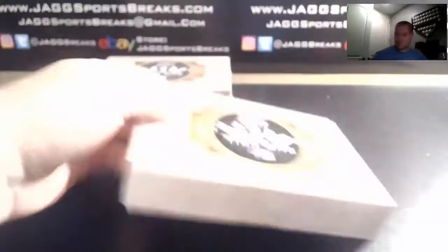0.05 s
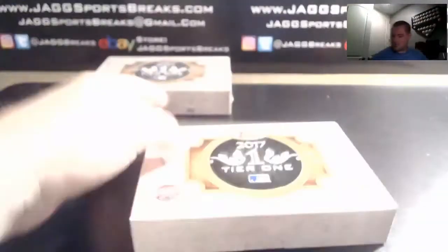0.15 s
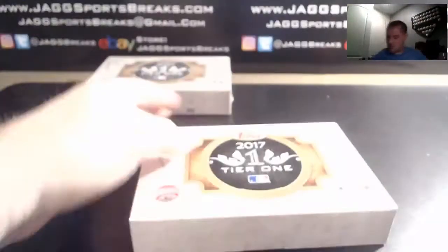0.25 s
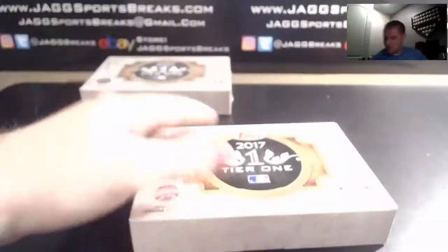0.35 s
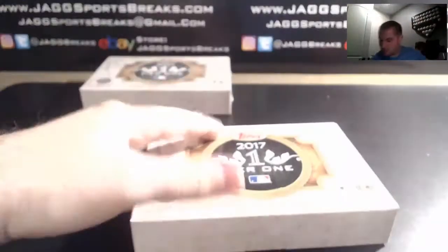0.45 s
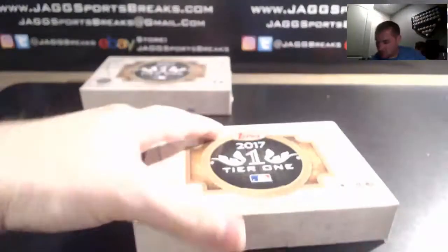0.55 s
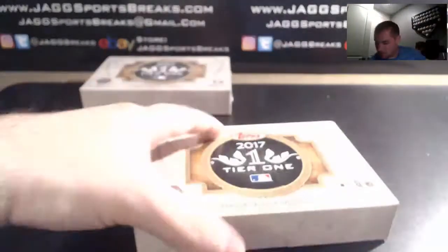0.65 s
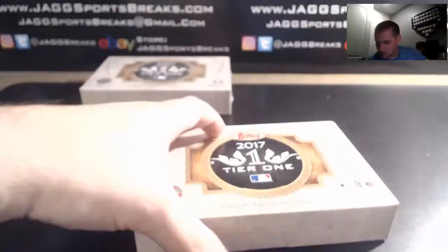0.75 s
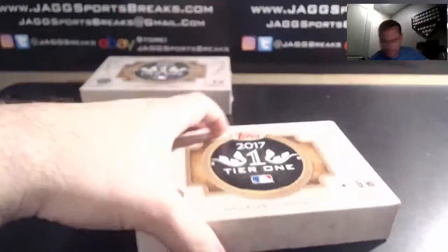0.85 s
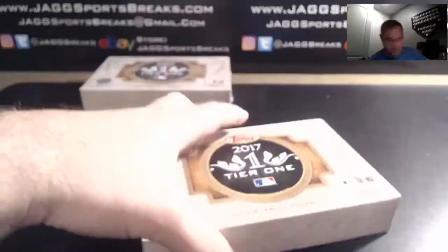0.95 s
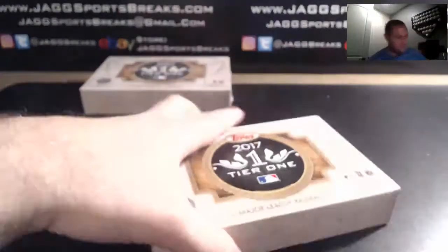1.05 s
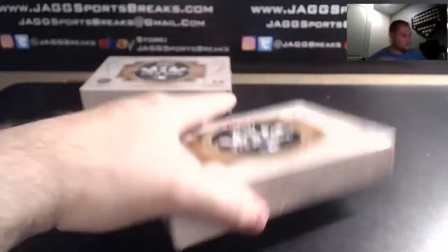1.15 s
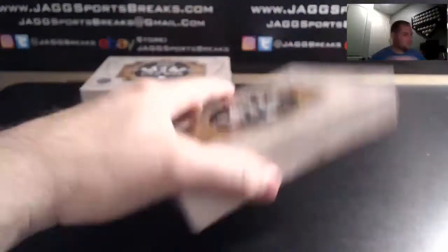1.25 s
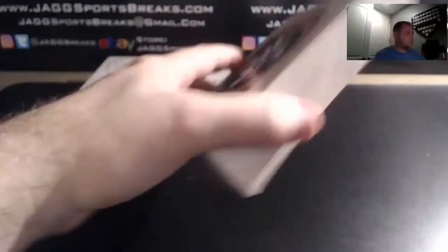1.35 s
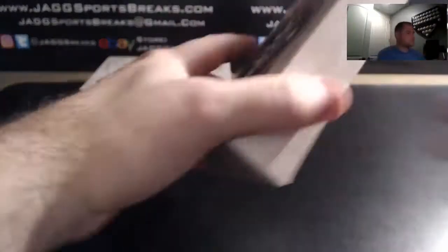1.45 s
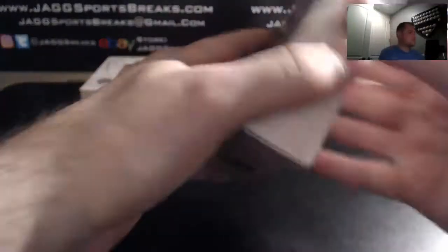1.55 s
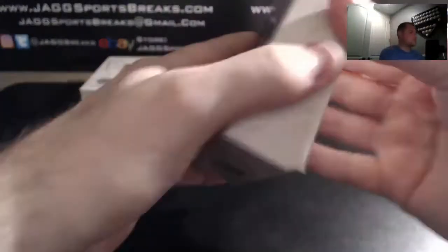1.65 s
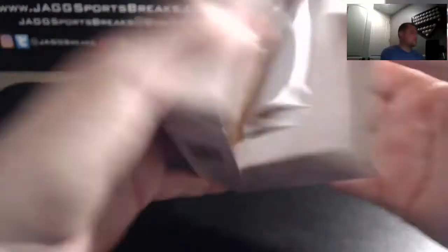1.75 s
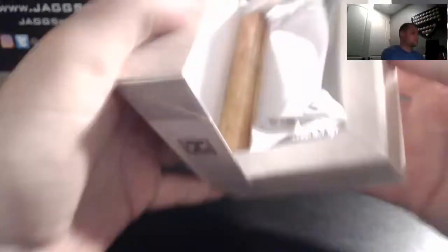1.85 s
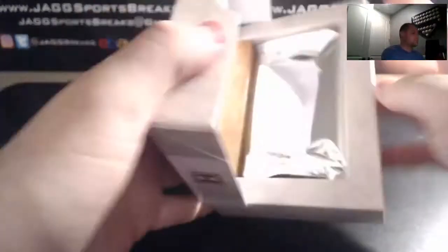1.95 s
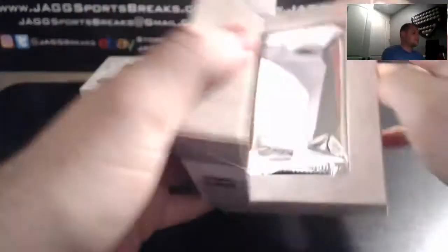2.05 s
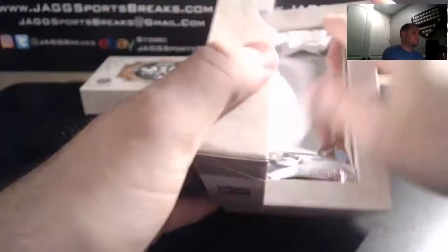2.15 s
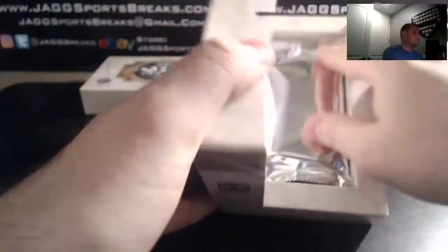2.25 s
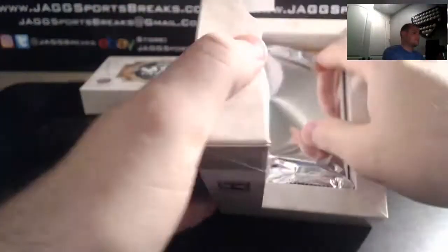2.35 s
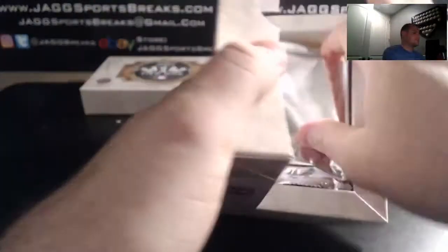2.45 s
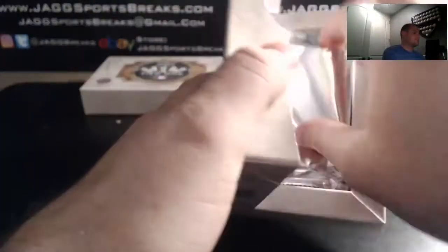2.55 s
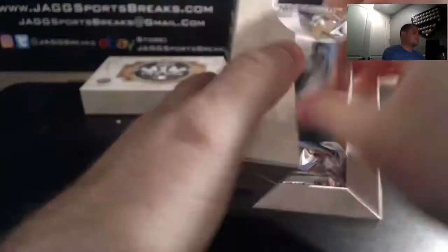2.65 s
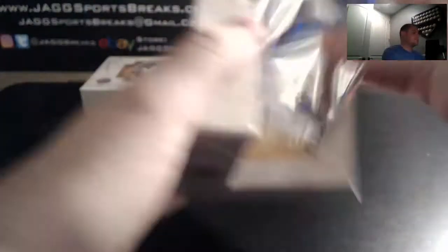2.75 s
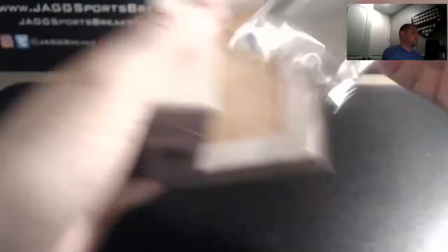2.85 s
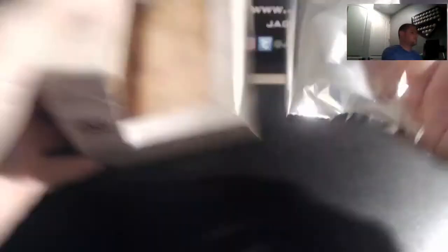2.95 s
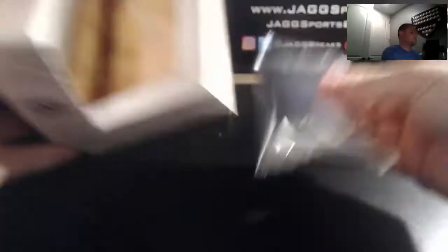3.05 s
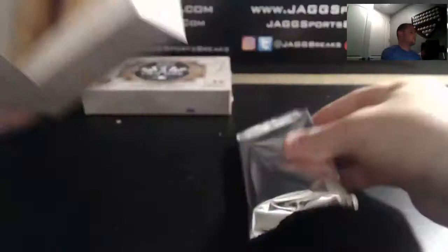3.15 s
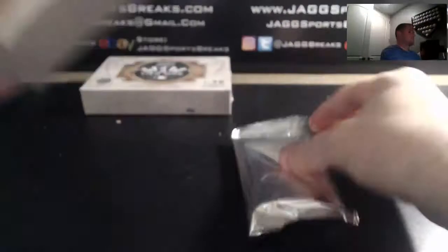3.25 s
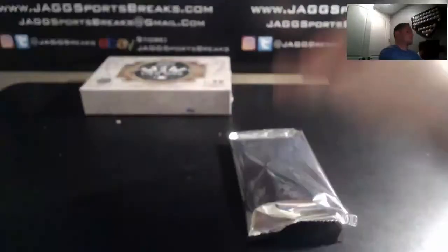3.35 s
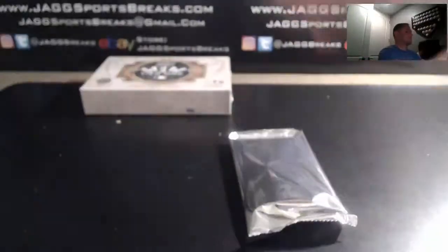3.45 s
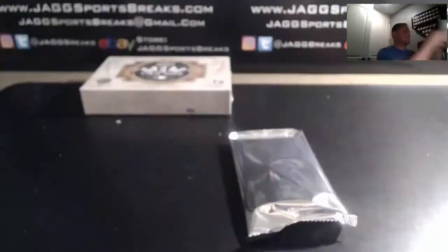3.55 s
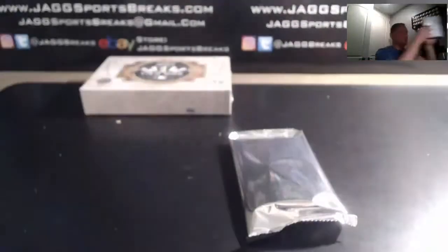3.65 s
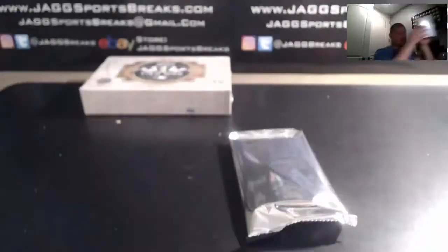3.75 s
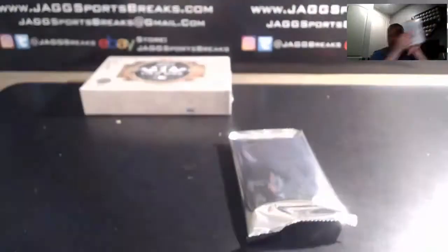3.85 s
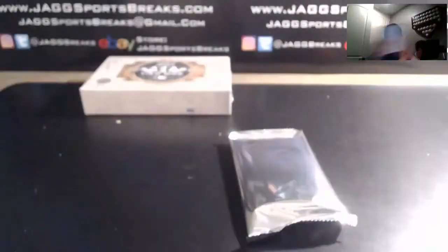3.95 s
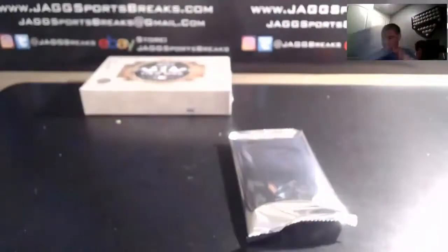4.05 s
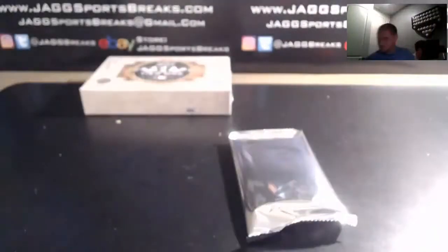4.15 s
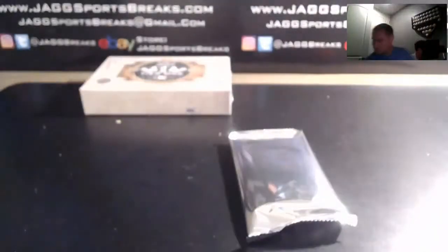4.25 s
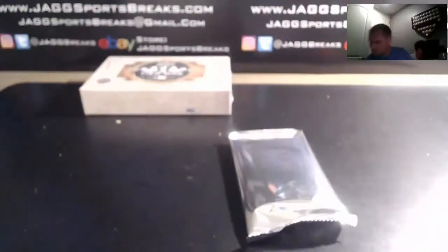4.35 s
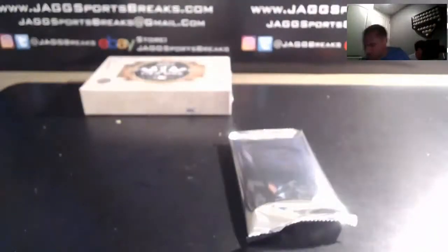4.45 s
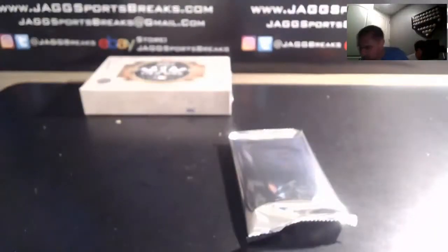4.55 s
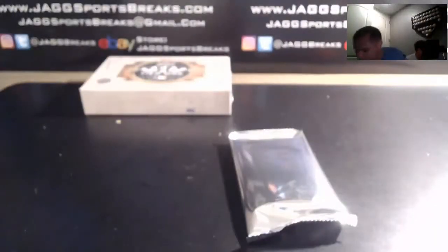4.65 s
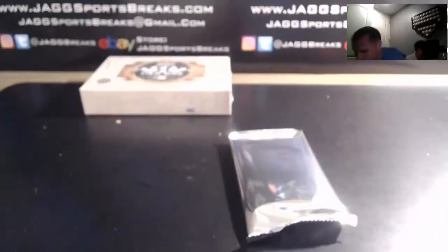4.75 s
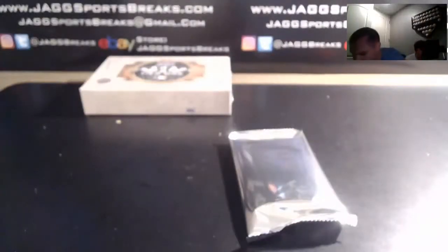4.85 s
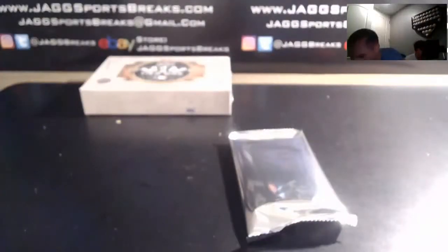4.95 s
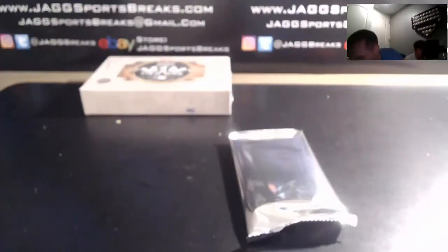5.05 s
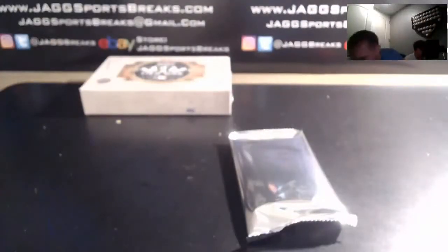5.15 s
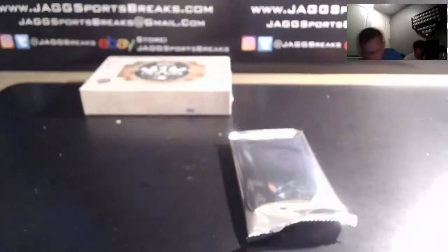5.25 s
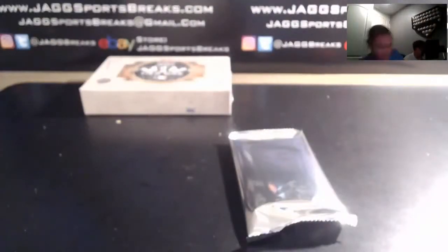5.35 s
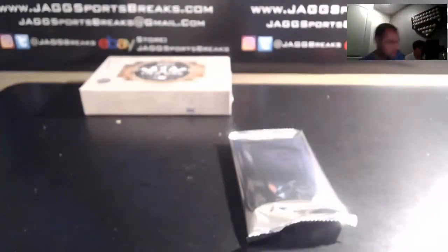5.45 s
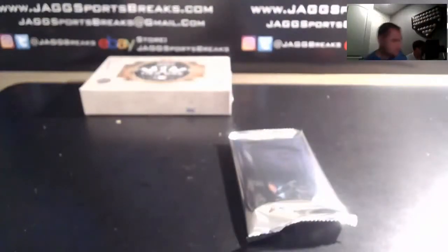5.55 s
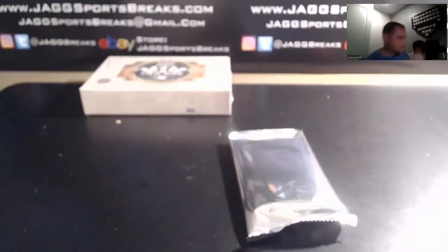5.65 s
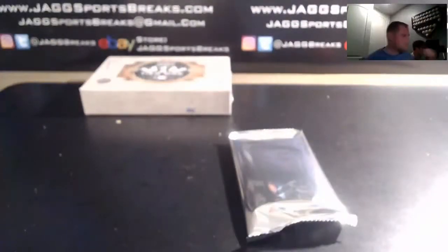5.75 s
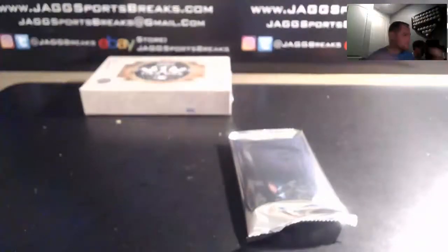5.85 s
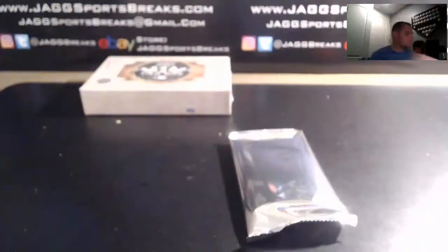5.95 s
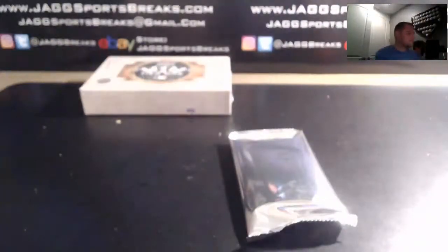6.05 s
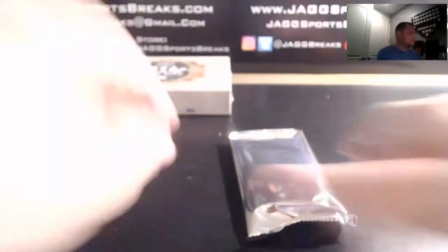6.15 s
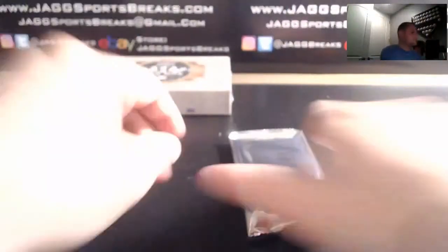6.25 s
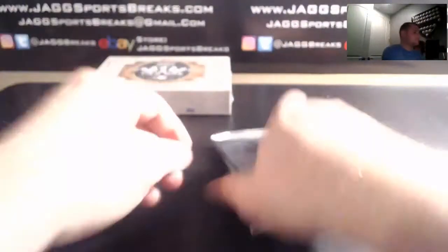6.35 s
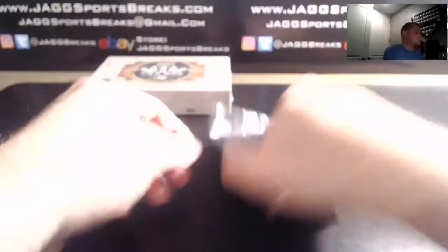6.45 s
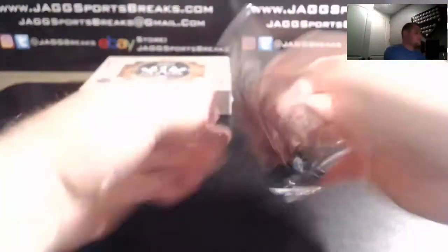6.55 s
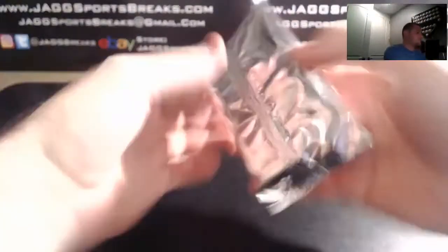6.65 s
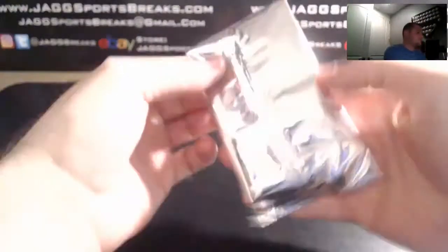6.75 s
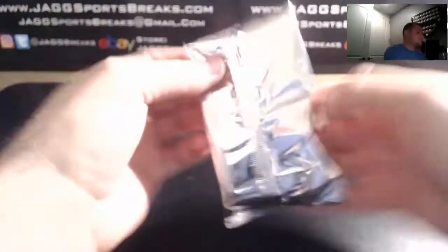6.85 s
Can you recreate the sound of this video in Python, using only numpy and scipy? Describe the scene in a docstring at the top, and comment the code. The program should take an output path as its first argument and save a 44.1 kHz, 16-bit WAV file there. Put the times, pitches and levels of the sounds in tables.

```python
"""At a desk in a small, bare room with a faint hum, a cardboard box is set down and its tight lid dragged off.
A plastic-wrapped card pack is pulled out, crinkling and squeaking, and laid down; the empty box is tossed
aside, something rustles beside the desk, and the pack is picked up again. Decaying noise bursts ring modes for
snaps, knocks and bumps; random grains shaped by hand strokes make the crinkle, drag and rubbing.
The close microphone overloads on the loudest blows."""
import sys
import numpy as np
from scipy import signal
from scipy.fft import rfft, irfft, next_fast_len
from scipy.io import wavfile
from scipy.ndimage import uniform_filter1d, map_coordinates

SR = 44100
rng = np.random.default_rng(int(sys.argv[2]) if len(sys.argv) > 2 else 0)


def put_to_file(sound):
    """Save the sound as 16-bit audio at rate SR, in the file named by the first command-line argument."""
    columns = np.atleast_2d(sound).T  # one column per channel
    safe = np.clip(columns, -1, 1)
    whole_steps = np.round(safe * 32767)
    wavfile.write(sys.argv[1], SR, whole_steps.astype(np.int16))


N = 304731
TIME = np.arange(N) / SR


def amp(db):
    """Amplitude ratio of a level in dB."""
    return 10 ** (np.asarray(db) / 20)


def unit(x):
    """x at an RMS of 1."""
    return x / np.sqrt(np.mean(x ** 2) + 1e-20)


def along(points, hz):
    """Interpolate (Hz, value) points on a log frequency axis."""
    f, v = np.transpose(points)
    return np.interp(np.log(hz + 1), np.log(f + 1), v)


def filtered(x, response):
    """x times a zero-phase response of frequency."""
    size = next_fast_len(len(x) + 8192)
    spectrum = rfft(x, size) * response(np.fft.rfftfreq(size, 1 / SR))
    return irfft(spectrum, size)[:len(x)]


def causal(x, gain, size=4096):
    """x through the minimum-phase filter that has this gain of frequency."""
    cepstrum = irfft(np.log(np.maximum(gain(np.fft.rfftfreq(size, 1 / SR)), 1e-6)))
    # Folding the cepstrum makes the phase minimal
    cepstrum[1:size // 2] *= 2
    cepstrum[size // 2 + 1:] = 0
    impulse_response = irfft(np.exp(rfft(cepstrum)))
    return signal.fftconvolve(x, impulse_response)[:len(x)]


def hump(hz, centre_hz, q):
    """Gain of one broad resonance."""
    ratio = (hz + 1) / centre_hz
    return 1 / np.sqrt(1 + (q * (ratio - 1 / ratio)) ** 2)


def wobble(rate):
    """A random curve of straight segments, rate knots a second."""
    knots = rng.standard_normal(int(N * rate / SR) + 4)
    return map_coordinates(knots, [TIME * rate], order=1)


def strokes(rows, power=1.89):
    """Gain over time: each movement speeds up from rest and slows to rest; sound grows as a power of speed."""
    gains = []
    for s, db, rise_s, fall_s in rows:
        speed = np.interp(TIME, [s - rise_s, s, s + fall_s], [0, 1, 0])
        gains.append(amp(db) * speed ** power)
    return np.linalg.norm(gains, axis=0)


def add(track, s, sound):
    """Mix a sound into the track at a time."""
    start = max(round(s * SR), 0)
    track[start:start + len(sound)] += sound[:max(N - start, 0)]


def grains(rate, spread_db):
    """Random tiny impulses, rate a second on average, mostly weak and a few strong."""
    size = amp(spread_db * np.minimum(rng.exponential(size=N), 4))
    present = rng.random(N) < rate / SR
    return present * rng.choice([-1, 1], N) * size


def patchy(x, depth_db):
    """Each band swells and fades by itself for some tens of milliseconds."""
    z = signal.stft(x, nperseg=256)[2]
    field = uniform_filter1d(rng.standard_normal(z.shape), size=7, axis=0)  # over frequency
    field = uniform_filter1d(field, size=9, axis=1)  # over time
    return unit(signal.istft(z * amp(depth_db * unit(field)), nperseg=256)[1][:N])


def room(x, wet_db, gap_s=0.0016):
    """The direct sound, then the walls' answer, each frequency dying at its own speed."""
    # Each row: frequency in Hz, t60 in s.
    decay_points = [(100, 0.36), (260, 0.33), (700, 0.31), (1840, 0.29), (4850, 0.29), (12800, 0.2)]
    hz, t, z = signal.stft(rng.standard_normal(SR // 2), SR, nperseg=256)
    decay = amp(-60 * t / along(decay_points, hz)[:, None])
    tail = signal.istft(z * decay, SR, nperseg=256)[1]
    tail *= 1 - np.exp(-(np.arange(len(tail)) / SR / gap_s) ** 2)
    answer = amp(wet_db) * tail / np.linalg.norm(tail)
    answer[0] += 1
    return signal.fftconvolve(x, answer)


def background(air_db=-53.5, waver_db=1):
    """Steady shaped room noise with two faint, slightly wavering hum tones."""
    # Quiet-room spectrum. Each row: frequency in Hz, relative gain in dB.
    air_points = [(25, -36), (185, -10), (270, -6), (2050, -11), (11300, -33), (16000, -56)]
    # Hum tones. Each row: frequency in Hz, RMS level in dB before the waver.
    hum_tones = [(119, -69), (204.6, -71)]
    air = unit(filtered(rng.standard_normal(N), lambda hz: amp(along(air_points, hz))))
    hum = np.zeros(N)
    for hz, db in hum_tones:
        level = np.sqrt(2) * amp(db + waver_db * wobble(rate=3.38))
        hum += level * np.sin(2 * np.pi * hz * TIME)
    return amp(air_db) * air + hum


def rub(level_db=-2, wet_db=-3):
    """Soft surfaces brush past each other: dense grains merge into a rough swish of changing colour."""
    # Soft-rubbing spectrum. Each row: frequency in Hz, relative gain in dB.
    rustle_points = [(70, -29), (229, -16.5), (424, -10), (1680, -5), (4020, -8.5), (10000, -16),
                     (16000, -21)]
    # Brushes of hand, sleeve and bag. Each row: fastest moment in s, relative level in dB, rise in s, fall in s.
    brushes = [(0.2, -41.5, 1, 0.48), (0.52, -47, 0.17, 0.39), (0.68, -40, 0.12, 0.063),
               (4.6, -22, 0.12, 0.16), (4.68, -30.5, 0.19, 0.8), (4.99, -27.5, 0.064, 0.23),
               (5.16, -42.5, 0.07, 0.094), (5.348, -26.5, 0.094, 0.14), (5.715, -46.5, 0.025, 0.066),
               (6.16, -42.5, 0.061, 0.098), (6.27, -38, 0.047, 0.078), (6.345, -34.5, 0.025, 0.035)]
    fibres = grains(rate=6000, spread_db=3.3) * amp(1.6 * wobble(rate=130))
    swish = patchy(causal(fibres, lambda hz: amp(along(rustle_points, hz))), depth_db=2.8)
    return room(amp(level_db) * strokes(brushes) * swish, wet_db)[:N]


def drag(level_db=-2, judder_db=4.0, wet_db=-2):
    """Card sticks and slips on card: juddering grains, coloured by the hollow box."""
    # Card-on-card spectrum. Each row: frequency in Hz, relative gain in dB.
    card_points = [(100, -24.5), (202, -8.5), (322, -12), (705, -2), (1610, -8), (10700, -31.5),
                   (16000, -37)]
    # Slides of box, lid and pack. Each row: fastest moment in s, relative level in dB, rise in s, fall in s.
    slides = [(0.002, -22, 0.021, 0.076), (0.39, -50.5, 0.045, 0.37), (1.59, -36.5, 0.054, 0.53),
              (1.721, -13.5, 0.068, 0.043), (1.655, -33, 0.038, 0.06), (1.77, -28.5, 0.032, 0.14),
              (1.96, -45, 0.02, 0.14), (2.1, -37.5, 0.12, 0.17), (2.22, -32.5, 0.063, 0.23),
              (2.58, -36, 0.14, 0.22), (2.72, -26.5, 0.11, 0.047), (3.236, -19.5, 0.0074, 0.048),
              (3.6, -26, 0.067, 0.083), (3.8, -41.5, 0.069, 0.19), (4.46, -47.5, 0.03, 0.14),
              (4.57, -27, 0.067, 0.24), (5.235, -38, 0.0054, 0.21)]
    slips = grains(rate=1400, spread_db=4.0) * amp(judder_db * wobble(rate=130))
    card = unit(causal(slips, lambda hz: amp(along(card_points, hz))))
    return room(amp(level_db) * strokes(slides) * card, wet_db)[:N]


def bumps(t60_s=0.18, q=0.86, level_db=19, wet_db=-10):
    """A soft, uneven push makes the desk top swing for a few cycles."""
    # Dull bumps carried by the desk. Each row: start in s, relative level in dB, pitch in Hz.
    pushes = [(0.092, -24, 227), (0.124, -13, 137), (1.526, -25.5, 209), (1.927, -17.5, 208),
              (2.096, -27.5, 159), (2.392, -30.5, 158), (2.205, -19.5, 296), (2.7, -22.5, 230),
              (3.138, -14, 226), (3.237, -15.5, 160), (3.548, -21.5, 189), (4.561, -12.5, 220),
              (4.645, -18.5, 233), (4.875, -34, 164), (6.299, -24.5, 138)]
    low_hz, steepness = 95, 10
    track, t = np.zeros(N), np.arange(SR // 4) / SR

    def bass_cut(hz):
        return hz ** steepness / (hz ** steepness + low_hz ** steepness)

    for s, db, pitch_hz in pushes:
        push = rng.standard_normal(len(t)) * amp(-60 * t / t60_s)
        push[0] += 25
        swing = causal(push, lambda hz: hump(hz, pitch_hz, q) ** 2 * bass_cut(hz))
        add(track, s, room(amp(db + level_db) * swing / np.linalg.norm(swing), wet_db))
    return track


def landing(s=0.11, attack_s=0.002):
    """The full box lands flat on the desk and its hollow body rings briefly."""
    # Modes of the hollow body. Each row: frequency in Hz, level in dB, t60 in s.
    body_modes = [(257, -13, 0.14), (428, -16, 0.29)]
    track, t = np.zeros(N), np.arange(SR // 2) / SR
    ring = sum(amp(db - 60 * t / t60_s) * np.sin(2 * np.pi * hz * t) for hz, db, t60_s in body_modes)
    add(track, s, ring * (1 - np.exp(-t / attack_s)))
    return track


def knocks(t60_s=0.035, q=2.2, panel_q=4, flat_db=-14, soft_hz=5000, level_db=13, wet_db=-1):
    """A short rough contact rings the well-damped box panels; its centre frequency picks which ones."""
    # Cardboard panel modes. Each row: frequency in Hz, relative gain in dB.
    panel_modes = [(255, -17), (425, -12), (635, -6), (980, -8.5), (1380, -10.5), (1850, -11.5),
                   (2800, -14)]
    # Knocks of box, lid and pack. Each row: start in s, relative level in dB, centre in Hz.
    contacts = [(0.002, -19, 550), (0.09, -11.5, 610), (0.12, 0, 1270), (0.122, -11, 2180), (0.123, 0, 480),
                (1.015, -23, 740), (1.525, -14.5, 1090), (1.567, -9, 780), (1.681, -15, 760),
                (1.713, 1, 1030), (1.723, 2, 1170), (1.821, -14, 970), (1.952, -17.5, 670),
                (2.007, -17.5, 686), (2.205, -7.5, 1040), (2.4, -19, 1160), (2.701, -12.5, 900),
                (3.137, -16, 1110), (3.545, -7, 960), (3.607, -16, 1000), (3.706, -17, 800),
                (3.814, -25, 930), (3.965, -17.5, 950), (4.029, -16.5, 870), (5.225, -22.5, 2020)]
    track, t = np.zeros(N), np.arange(SR // 8) / SR

    def panels(hz):
        return amp(flat_db) + sum(amp(db) * hump(hz, f, panel_q) ** 2 for f, db in panel_modes)

    for s, db, centre_hz in contacts:
        contact = rng.standard_normal(len(t)) * amp(-60 * t / t60_s)
        contact[0] += 9  # the first touch is the hardest
        knock = causal(contact, lambda hz: panels(hz) * hump(hz, centre_hz, q) / np.hypot(1, hz / soft_hz))
        add(track, s, room(amp(db + level_db) * knock / np.linalg.norm(knock), wet_db))
    return track


def squeak(jitter=0.064, rise_per_s=3.0, squeal_db=-4, squeal_hz=2560, squeal_jitter=0.11,
           scrape_db=-2, scrape_hz=1500, wet_db=-3):
    """The wrapper slips unevenly over the rim: a hollow squawk, with a thin squeal rising as the film tightens."""
    # Each row: fastest moment in s, relative level in dB, rise in s, fall in s, mean slips per s.
    rim_slides = [(2.5, -27, 0.035, 0.031, 545), (2.581, -30, 0.027, 0.011, 750)]
    track = np.zeros(N)
    for s, db, rise_s, fall_s, slip_hz in rim_slides:
        turns = np.cumsum(slip_hz * (1 + jitter * wobble(rate=240))) / SR
        tone = unit(np.sin(2 * np.pi * turns) * amp(3.4 * wobble(rate=300)))
        # One random impulse per slip
        slips = np.diff(np.floor(turns), prepend=0) * rng.standard_normal(N)
        scrape = unit(causal(slips, lambda hz: hump(hz, scrape_hz, 1.0)))
        tension = 1 + rise_per_s * np.clip(TIME - s, -rise_s, fall_s)
        pitch_hz = squeal_hz * tension * (1 + squeal_jitter * wobble(rate=1500))
        squeal = unit(np.sin(2 * np.pi * np.cumsum(pitch_hz) / SR))
        squawk = tone + amp(scrape_db) * scrape + amp(squeal_db) * squeal
        track += strokes([(s, db, rise_s, fall_s)], power=1) * squawk
    return room(track, wet_db)[:N]


def crinkle(cycles=1.1, lowest_hz=1100, highest_hz=14000, wet_db=-4):
    """Countless small creases give way in clumps under the fingers; neighbours ring at kindred pitches."""
    # Crinkling-wrapper spectrum. Each row: frequency in Hz, relative gain in dB.
    film_points = [(240, -24.5), (753, -1.5), (1760, -5), (5350, -11), (9470, -8.5), (16000, -27)]
    # Squeezes of the wrapper. Each row: fastest moment in s, level in dB, rise in s, fall in s.
    squeezes = [(2.11, -31.5, 0.011, 0.059), (2.27, -34.5, 0.15, 0.063), (2.41, -28, 0.042, 0.021),
                (2.585, -25, 0.087, 0.17), (2.73, -23.5, 0.4, 0.097), (2.84, -40, 0.041, 0.24),
                (3.14, -27.5, 0.009, 0.074), (3.245, -26, 0.15, 0.044), (3.29, -25, 0.079, 0.052),
                (6.705, -35, 0.058, 0.22), (6.812, -29, 0.13, 0.026)]
    creases = grains(rate=1700, spread_db=3.0) * amp(8 * np.tanh(wobble(rate=130)))
    starts, ring = np.flatnonzero(creases)[:, None], np.arange(SR // 200)
    drift = 0.25 * wobble(rate=70)[starts]
    smallness = (0.5 + drift + 0.2 * rng.standard_normal(starts.shape)) % 1
    pitch_hz = lowest_hz * (highest_hz / lowest_hz) ** smallness
    turns = pitch_hz * ring / SR
    pings = creases[starts] * pitch_hz * np.sin(2 * np.pi * turns) * np.exp(-turns / cycles)
    # Sum the overlapping pings into one track
    crackle = np.bincount((starts + ring).ravel(), pings.ravel(), N)[:N]
    film = causal(crackle, lambda hz: amp(along(film_points, hz)))
    return room(strokes(squeezes) * unit(film), wet_db)[:N]


def snaps(loud_q=2.6, q_per_db=0.13, second_ratio=2.01, second_db=-7.0, bass_share=0.54, buckle_t60_s=0.012,
          crack_t60_s=0.026, crack_hz=7500, edge_ratio=1.37, level_db=8, wet_db=-1.0):
    """A crease buckles, ringing two facet modes, and a bright crack runs along the fold; hard snaps are drier."""
    # Wrapper creases, and sharp ticks of nails and box edges.
    # Each row: start in s, relative level in dB, main ring in Hz, crack in dB relative to the ring.
    creases = [(0.6733, -19.5, 4040, -25), (1.013, -30, 3250, 7), (1.101, -17.5, 1650, -28),
               (2.1075, -13.5, 4830, -11), (2.1906, -5.5, 1450, 1), (2.2777, -12.5, 2500, 4),
               (2.333, -11.5, 2560, -20), (2.3544, -15, 4260, -18), (2.399, -6.5, 2130, -5),
               (2.465, -24, 2540, -12), (2.503, -16, 2400, 7), (2.5065, -2.5, 5040, 14),
               (2.562, -4, 3120, 6), (2.572, -7, 2420, -7), (2.592, 0, 2420, 8), (2.6607, -6, 2380, -2),
               (2.7, -3.5, 1670, 2), (2.7304, -2.5, 4400, 5), (2.76, -8, 1890, 6), (2.831, -9.5, 2120, 0.5),
               (2.9734, -24, 4040, -23), (3.04, -3, 1980, -18), (3.088, -14.5, 3100, -26),
               (3.1353, 1.5, 1800, 10), (3.191, -16, 2850, -16), (3.236, -4, 6100, -6),
               (3.2427, -0.5, 3450, 1.5), (3.284, -5, 3700, -2), (3.2999, -6.5, 1500, -25),
               (3.5465, -5.5, 1260, -1.5), (3.8143, -26.5, 2520, 2), (3.966, -23, 2060, -2),
               (4.019, -23, 2270, -11), (4.029, -27, 2310, 4), (5.709, -25.5, 3540, -1),
               (6.148, -22.5, 6360, -1), (6.2665, -19.5, 3670, -9), (6.4193, -7.5, 3510, -1.5),
               (6.429, -10.5, 3900, 17), (6.479, -29, 2580, -8), (6.514, -18.5, 1660, -3),
               (6.613, -30.5, 3430, -7), (6.6465, -12, 1890, -5), (6.6568, -6, 1890, 5),
               (6.6717, -6.5, 2100, -2), (6.6805, -10.5, 3050, -1), (6.703, -6, 1760, -4),
               (6.784, -9, 2400, -5), (6.796, -3, 1610, -3.5), (6.802, -3, 2280, 2), (6.811, -7, 3040, -13),
               (6.901, -13, 1980, 10)]
    track, t = np.zeros(N), np.arange(SR // 20) / SR
    for s, db, main_hz, bright_db in creases:
        q, second_hz = loud_q - q_per_db * db, second_ratio * main_hz
        low_hz, edge_hz = bass_share * main_hz, edge_ratio * second_hz
        decays = amp(-60 * t / [[buckle_t60_s], [crack_t60_s]])
        buckle, run = rng.standard_normal((2, len(t))) * decays
        buckle[0] = 3.5  # first click

        def facet_gain(hz):
            modes = hump(hz, main_hz, q) + amp(second_db) * hump(hz, second_hz, q)
            bass_cut = hz ** 4 / np.hypot(hz ** 4, low_hz ** 4)  # a facet radiates little below its modes
            return modes * bass_cut / np.hypot(1, (hz / edge_hz) ** 2)

        def crack_gain(hz):
            return hump(hz, crack_hz, q=0.28) * hz ** 2 / (hz ** 2 + low_hz ** 2)

        snap = unit(causal(buckle, facet_gain)) + amp(bright_db) * unit(causal(run, crack_gain))
        add(track, s, room(amp(db + level_db) * snap / np.linalg.norm(snap), wet_db, gap_s=0.0039))
    return track


def scene():
    """Sum of all layers, one channel."""
    bed = background() + rub() + drag()
    box = bumps() + landing() + knocks()
    wrapper = squeak() + crinkle() + snaps()
    return (bed + box + wrapper)[None]


def record(dry):
    """The microphone colours the sound, clips at full scale, loses the deep bass and is band-limited."""
    # Each row: frequency in Hz, gain in dB.
    colour = [(40, -8), (70, 4.5), (100, 7.5), (1000, 1.0), (6500, 2.5),
              (8000, -0.5), (9800, 2.0), (13000, -1.5), (16000, -10.5)]
    low_cut_hz, top_hz = 36, 16100
    heard = np.clip(causal(dry[0], lambda hz: amp(along(colour, hz))), -1, 1)
    return filtered(heard, lambda hz: (hz < top_hz) * hz ** 3 / np.hypot(hz ** 3, low_cut_hz ** 3))[None]


dry = scene()
out = record(dry)
put_to_file(out)
```